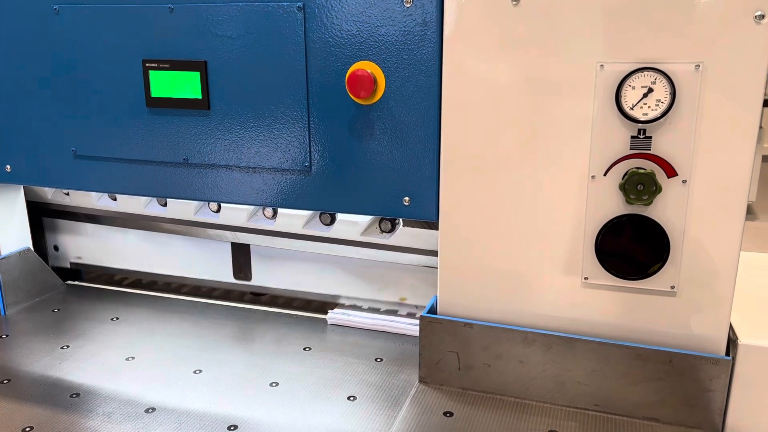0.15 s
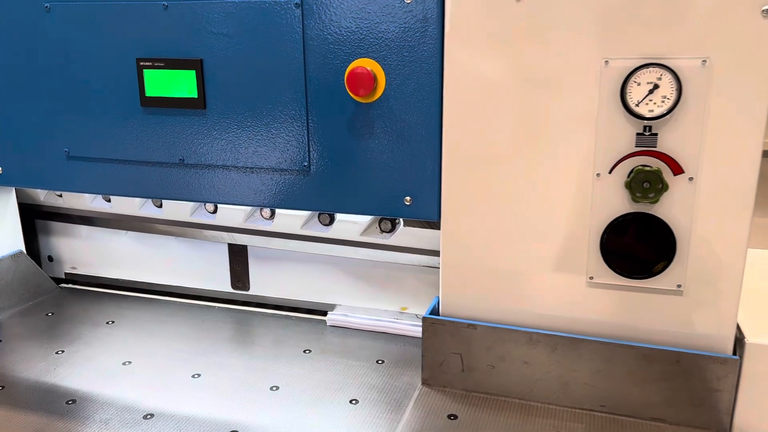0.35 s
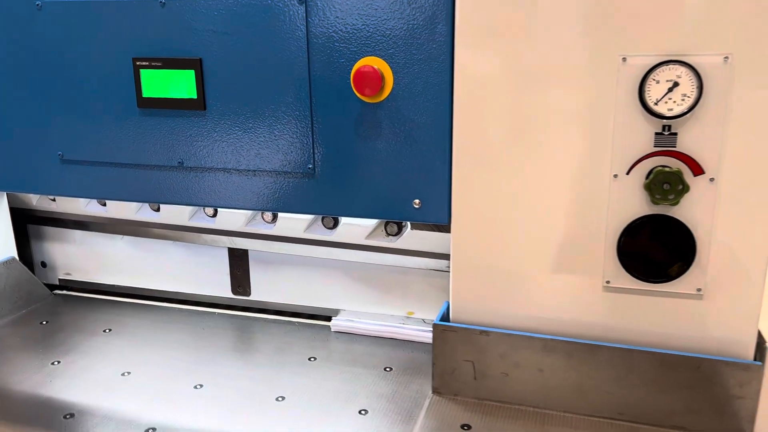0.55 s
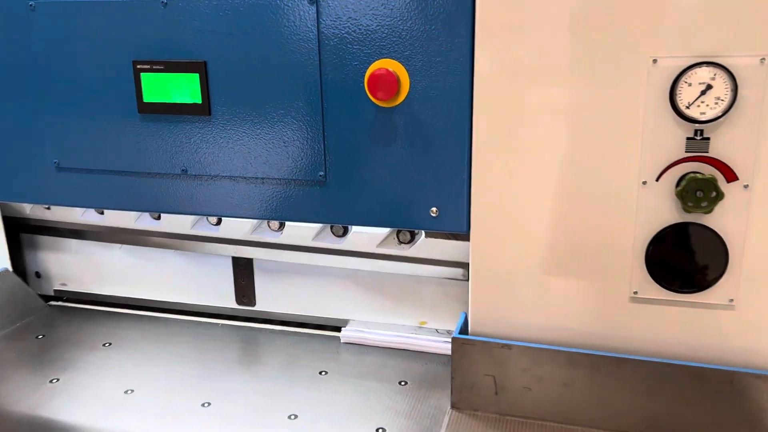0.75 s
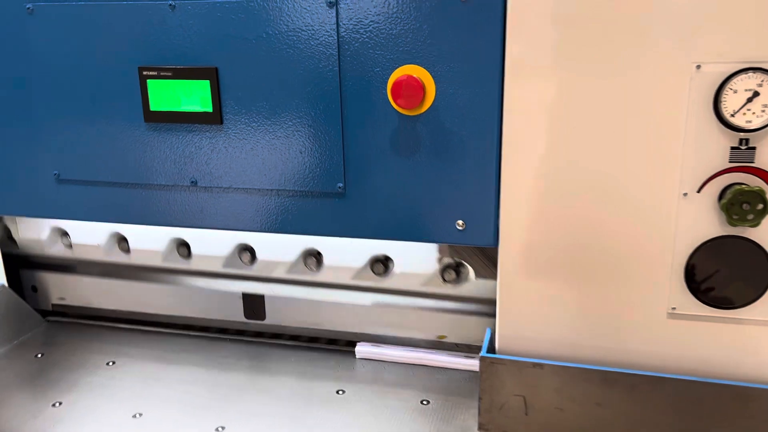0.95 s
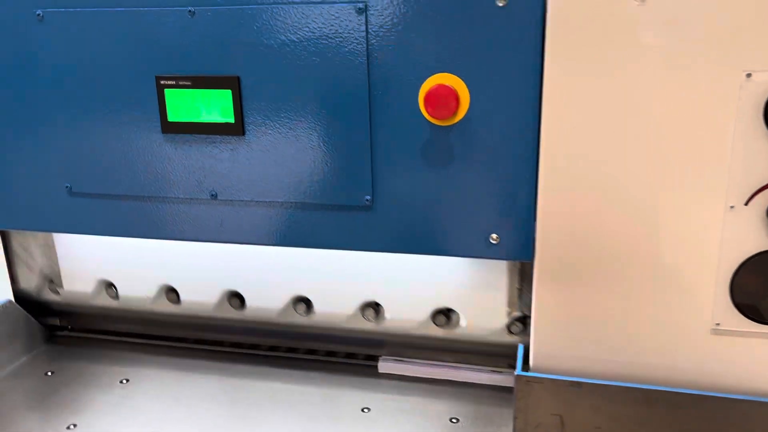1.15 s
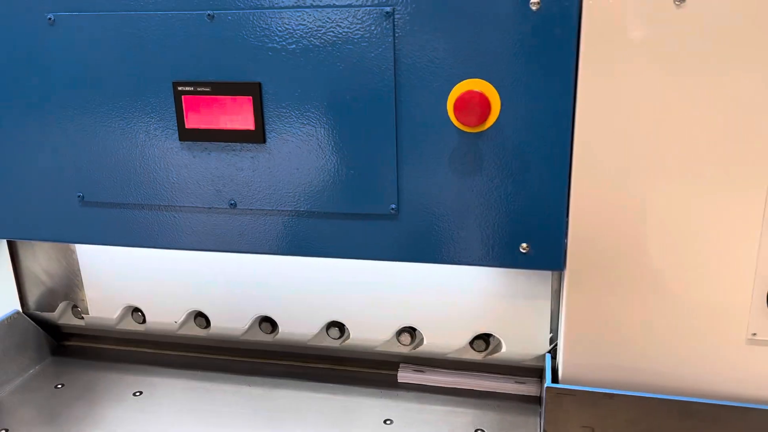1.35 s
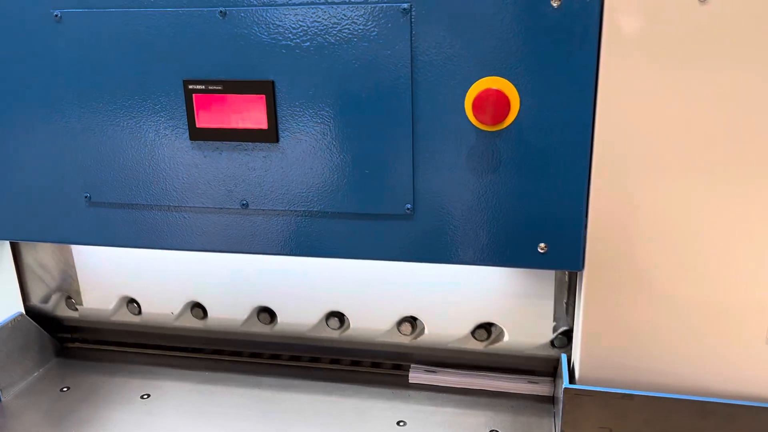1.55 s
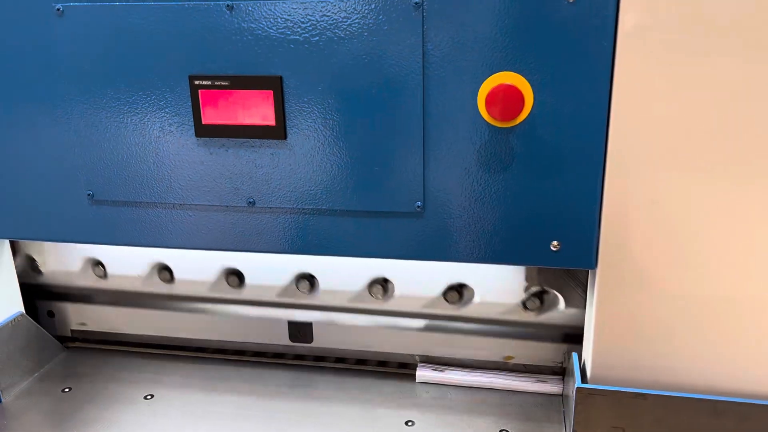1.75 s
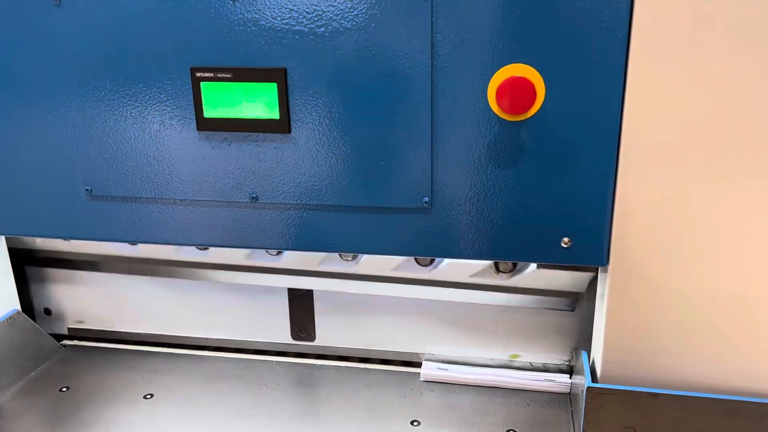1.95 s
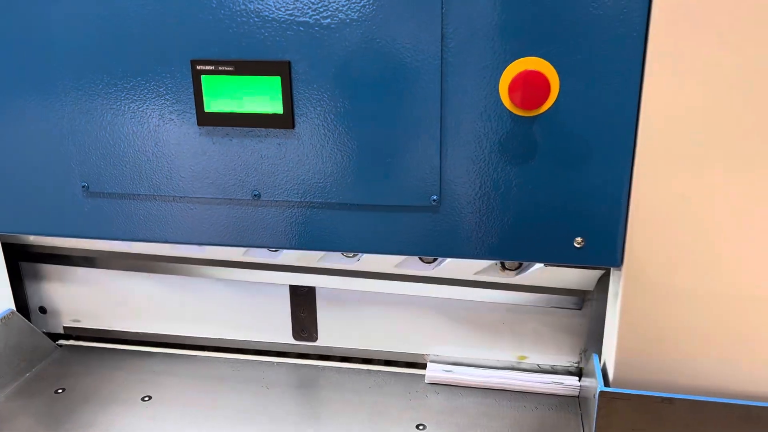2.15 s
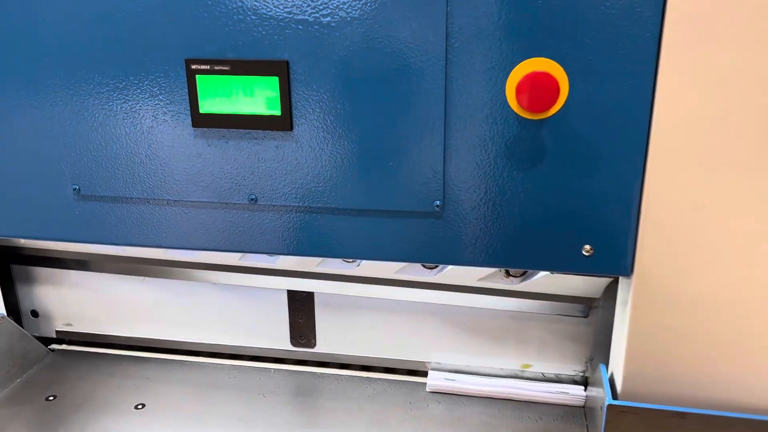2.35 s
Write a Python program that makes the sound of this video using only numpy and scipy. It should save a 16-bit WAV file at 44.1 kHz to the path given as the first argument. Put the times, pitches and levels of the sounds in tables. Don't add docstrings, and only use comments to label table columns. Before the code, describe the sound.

An industrial paper cutter, close in stereo in a humming, faintly whining workshop with a fading air leak. At 0.2 s a valve clacks, rattles and vents; oil rushes and the pump drones louder until the clamp thuds at 0.65. Gears and motor hum from 0.75. At 1.22 the knife shears paper with a bright hiss and dull crunch. Around 1.97 the brake clatters, then the flywheel hum fades.

```python
import sys
import numpy as np
from scipy import signal
from scipy.fft import rfft, irfft, next_fast_len
from scipy.io import wavfile

SR = 44100
rng = np.random.default_rng(int(sys.argv[2]) if len(sys.argv) > 2 else 0)


def undo_db(level):
    steps = np.asarray(level, float) / 20
    return 10 ** steps


def wrap_up_sound(samples):
    columns = np.atleast_2d(samples).T
    tamed = np.clip(columns, -1, 1)
    steps = np.round(tamed * 32767).astype(np.int16)
    wavfile.write(sys.argv[1], SR, steps)


N = 110250
TIME = np.arange(N) / SR
EDGES = 24 * 2 ** np.arange(0, 9.5, 1 / 3)
VALVE_S, OIL_S = 0.219, 0.223


def rms_one(x):
    return x / np.sqrt(np.mean(x ** 2) + 1e-20)


def in_time(rows):
    s, *columns = np.transpose(rows)
    return [np.interp(TIME, s, c) for c in columns]


def at_hz(points, hz, order=1):
    points = np.array(points)
    return np.interp(np.log(hz), np.log(points[:, 0]), points[:, order])


def drift(rate):
    r = np.exp(-80 * np.pi * rate / SR)
    slow = signal.lfilter([1], [1, -2 * r, r * r], rng.standard_normal(N // 40 + 2002))[2000:]
    return np.interp(np.arange(N) / 40, np.arange(len(slow)), rms_one(slow))


def share(spectrum):
    hz = np.sqrt(EDGES[1:] * EDGES[:-1])
    power = undo_db(2 * at_hz(spectrum, hz)) * np.diff(EDGES)
    return (power / power.sum())[:, None]


def tone(hz, width_hz, rough):
    turn = 2 * np.pi * np.cumsum(hz + 0 * TIME) / SR
    draws = []
    for _ in range(2):
        phase = turn + rough * drift(width_hz) + rng.uniform(0, 2 * np.pi)
        strength = np.abs(1 + 0.38 * rough * drift(width_hz))
        draws.append(np.sqrt(2) * np.sin(phase) * strength)
    return np.array(draws)


def shop_air():
    # frequency in Hz, density in dB per Hz
    shop_spectrum = [(25, -36), (110, -3), (300, -5.5), (900, -16), (1600, -19), (5600, -43.5), (8200, -34),
                     (15000, -47)]
    return share(shop_spectrum) * undo_db(2 * -33)


def shop_whine():
    # pitch in Hz, width in Hz, level in dB
    whines = [(803, 7.5, -50), (844, 8, -50.5), (873, 4, -44), (893, 6.4, -48), (1120, 6.6, -52.5),
              (4040, 140, -59.5), (4130, 130, -60.5)]
    masked = (TIME > VALVE_S) * (TIME < 2.0)
    return undo_db(-6 * masked) * sum(undo_db(db) * tone(hz, width, rough=0.6 + width / 120)
                                  for hz, width, db in whines)


def air_leak():
    # frequency in Hz, density in dB per Hz
    leak_spectrum = [(2500, -17), (4200, -9), (5400, -13), (7000, -21)]
    t60_s = 2.8
    return share([(20, -90)] + leak_spectrum + [(20000, -90)]) * undo_db(2 * -41.5 - 120 * TIME / t60_s)


def frame_rumble():
    # time in seconds, level in dB
    load_curve = [(0, -26.5), (.2, -38), (.25, -16.5), (.45, -26), (.62, -29.5), (.72, -26), (.78, -24.5),
                  (1.2, -25), (1.45, -23), (1.6, -25.5), (1.95, -23), (2.05, -25.5), (2.25, -29.5),
                  (2.5, -43)]
    # frequency in Hz, density in dB per Hz
    rumble_spectrum = [(25, -38.5), (100, -6.5), (280, -2), (750, -21.5), (2700, -27.5), (6000, -42.5),
                       (8200, -41), (15000, -57.5)]
    return share(rumble_spectrum) * undo_db(2 * in_time(load_curve)[0] - 3.5)


def pump():
    # time in seconds, pitch in Hz, level in dB
    pump_curve = [(0, 221.9, -35.5), (.2, 223.1, -41), (.23, 224.3, -28.5), (.36, 226.2, -29),
                  (.42, 225.9, -22), (.64, 221.2, -20), (.69, 220, -27), (.77, 219.8, -25.5),
                  (.82, 219.5, -26), (.95, 221.1, -27.5), (1.95, 218.4, -29.5), (2.15, 219, -32.5),
                  (2.32, 220, -50), (2.5, 221.6, -41.5)]
    # multiple of the pulse rate, level in dB
    pump_orders = [(1, -0.5), (2, -20), (3, -34)]
    hz, db = in_time(pump_curve)
    return sum(undo_db(db + order_db) * tone(k * hz, 3.8 * k, rough=0.35 * k) for k, order_db in pump_orders)


def vent_and_shear():
    # time in seconds, level in dB
    slide_curve = [(.217, -68), (.222, -32.5), (.29, -40), (.33, -55.5), (1.218, -63), (1.222, -19),
                   (1.26, -25.5), (1.32, -30), (1.345, -43), (1.52, -39.5), (1.56, -45), (1.93, -47),
                   (2.09, -43.5), (2.14, -98)]
    # frequency in Hz, density in dB per Hz
    shear_spectrum = [(700, -12.5), (1200, -16.5), (2500, -21), (4500, -22), (6500, -36.5), (8500, -20),
                      (14000, -24.5)]
    return share([(200, -52.0)] + shear_spectrum) * undo_db(2 * in_time(slide_curve)[0])


def blows(hz):
    # start in seconds, level in dB, tilt in dB per octave, T60 in seconds
    valve_blows = [
        (.219, -11, -1, 0.051),
        (0.223, -16.5, -1.5, 0.12),
        (.2405, -21, -1.5, 0.052),
        (0.247, -14.5, -3, 0.12),
        (.269, -19, -2, 0.061),
    ]
    clamp_blows = [
        (0.646, -21, -3, 0.16),
        (0.67, -41.5, 0.5, 0.078),
        (0.753, -33, -6.5, 0.4),
        (0.843, -62, -8, 0.12),
    ]
    knife_blows = [
        (1.2194, -30, 4, 0.018),
        (1.236, -35, -10, 0.13),
        (1.274, -25.5, -1.5, 0.27),
        (1.305, -39, -2.5, 0.072),
    ]
    brake_blows = [
        (1.9642, -23, -2, 0.13),
        (1.966, -20.5, -3, .06),
        (1.972, -15.5, -4.5, 0.06),
        (1.977, -20, -4.5, 0.2),
        (1.996, -24, -4, 0.1),
        (1.942, -42, 2, 0.06),
    ]
    hall_db, hall_t60_s = -23.5, 1
    knee_hz, below_knee_db = 556, 5.5
    top_hz, top_steeper = 3500, 5
    t = TIME[:SR * 3 // 4]
    dulling = (hz / 1000) ** 0.32
    rise = 1 - np.exp(-t / (0.91 / hz + 0.001))
    hall = undo_db(2 * hall_db - 120 * t * dulling / hall_t60_s)
    octaves = np.log2(max(hz, knee_hz) / 1000)
    top = top_steeper * np.log2(max(hz / top_hz, 1))
    thinning_db = below_knee_db * np.log2(min(hz / knee_hz, 1))
    out = np.zeros(N + SR)
    for s, db, tilt_db, t60 in valve_blows + clamp_blows + knife_blows + brake_blows:
        power = undo_db(2 * (db + tilt_db * octaves + min(tilt_db, 0) * top + thinning_db))
        decay = np.exp(-2 * np.log(1000) * dulling / t60 * t)
        start = int(s * SR)
        out[start:start + len(t)] += power * rise * (decay + hall)
    return out[:N] / 8


def rings():
    # start in seconds, pitch in Hz, level in dB, T60 in seconds
    thuds = [(.222, 232, -2, 0.039), (.246, 233, -23.5, 0.16), (.25, 121.2, -20, 0.32), (.25, 440, -17, .1),
             (.653, 420, -16, .08), (.31, 328.4, -22.5, 0.34), (.269, 325.4, -16.5, 0.18),
             (.649, 461, -6, 0.026), (.655, 283.6, -10.5, .15), (1.219, 153.3, -11, 0.13),
             (1.2242, 212, -13, 0.12), (1.2335, 217, -8, 0.12), (1.2382, 215, -9, .07),
             (1.236, 353.4, -12, 0.12), (1.44, 124.6, -15.5, 0.32), (1.37, 199, -14, .15),
             (1.455, 172, -14.5, 0.14), (1.958, 253, -13.5, .06), (1.969, 500, -5, 0.06),
             (1.972, 300, -10.5, 0.079), (1.9792, 295, -1, 0.045), (1.979, 345, -9, 0.065),
             (1.97, 624, -13.5, .08), (1.992, 481, -17, 0.097), (2.012, 131.6, -10, 0.13),
             (2.014, 198, -15, 0.088)]
    # start in seconds, pitch in Hz, level in dB, T60 in seconds
    pings = [(0.219, 1355, -13.5, 0.042), (.221, 833, -9.5, 0.034), (.245, 838, -10, 0.07),
             (.241, 2150, -17, .05), (.248, 2030, -20, 0.064), (.242, 2800, -23, 0.055),
             (0.7, 700, -33, 0.054), (0.649, 1057, -24, 0.06), (.845, 1100, -25, 0.055),
             (1.221, 2450, -20.5, 0.046), (1.254, 2550, -24, .06), (1.226, 4400, -28, 0.054),
             (1.284, 3100, -26.5, .05), (1.29, 4900, -31.5, 0.056), (1.22, 8300, -25, 0.027),
             (1.28, 560, -21.5, .15), (1.274, 1010, -15, 0.09), (1.27, 1110, -20, 0.069),
             (1.222, 1580, -20, 0.055), (1.355, 910, -27, 0.11), (1.272, 2070, -22, 0.07),
             (1.302, 715, -17, 0.08), (.648, 2800, -27, .05), (.65, 3300, -29, .04), (.652, 1900, -27, .05),
             (.258, 1650, -22, .08), (.232, 1900, -22, .05), (1.838, 1036, -26.5, 0.2),
             (1.966, 2270, -19.5, 0.037), (1.968, 1160, -15.5, 0.068), (1.97, 1060, -16.5, 0.11),
             (1.966, 1450, -19.5, .05), (1.97, 2090, -23, .05), (1.966, 2440, -24, 0.04),
             (1.972, 2900, -27, 0.037), (1.974, 3720, -31, 0.034), (1.97, 790, -15, 0.11),
             (1.995, 1050, -16, 0.051), (0.219, 2840, -11.5, .03), (.22, 3700, -23, 0.029),
             (.22, 2620, -16, 0.036)]
    out = np.zeros((2, N))
    for s, hz, db, t60 in thuds + pings:
        start = int(s * SR)
        t = TIME[:min(SR // 2, N - start)]
        swell = 1 - np.exp(-t / (0.3 / hz + 0.0008))
        phase = rng.uniform(0, 2 * np.pi) * np.array([[0], [1]])
        out[:, start:start + len(t)] += undo_db(db - 60 * t / t60) * swell * np.sin(2 * np.pi * hz * t + phase)
    return out


def oil_flow():
    # frequency in Hz, density in dB per Hz
    oil_spectrum = [(600, -5), (1200, 3), (2800, -9), (5000, -42)]
    t60_s = 2.95
    flow = (TIME > OIL_S) * undo_db(2 * -32 - 120 * (TIME - OIL_S) / t60_s)
    return share([(20, -90)] + oil_spectrum + [(20000, -90)]) * flow


def gear_drive():
    # pitch in Hz, width in Hz, level in dB
    gear_tones = [(243, 5, -37), (279.8, 6, -28.5), (327, 7.8, -38), (371.2, 4.1, -42), (384.6, 6, -37.5),
                  (465.2, 5.2, -35), (561, 1.8, -40), (624.6, 7.1, -44.5), (666, 5, -48.5), (1030, 13, -47),
                  (1051, 12, -47), (2055, 14, -51.5)]
    on_s, off_s, rise_s, t60_s = 0.715, 1.99, 0.075, 0.38
    on = np.clip((TIME - on_s) / rise_s, 0, 1) * undo_db(-60 * np.maximum(TIME - off_s, 0) / t60_s)
    return on * sum(undo_db(db) * tone(hz, width, rough=0.6 + width / 30) for hz, width, db in gear_tones)


def mains():
    on_s, off_s = 0.8, 1.84
    loaded = np.clip(np.minimum(TIME - on_s, off_s - TIME) / 0.072, .15, 1)
    powered = (TIME > on_s - .05) * np.clip((2.2 - TIME) / 0.33, 0, 1)
    return undo_db(-31) * loaded * powered * tone(100.8, 1.5, rough=0.12)


def coast():
    # pitch in Hz, width in Hz, level in dB
    coast_tones = [(199, 4.4, -30), (295, 5, -34.5), (397, 5.9, -31.5), (514, 6.4, -37.5)]
    start_s, rise_s, t60_s = 2.01, 0.071, 1.7
    on = np.clip((TIME - start_s) / rise_s, 0, 1) * undo_db(-60 * np.maximum(TIME - start_s, 0) / t60_s)
    return on * sum(undo_db(db) * tone(hz, width, rough=0.53) for hz, width, db in coast_tones)


def noises():
    wavering = shop_air() + frame_rumble()
    smooth = air_leak() + vent_and_shear() + oil_flow()
    white = rng.standard_normal((2, 2, N + 8192))
    together = drift(12.5)
    out = np.zeros((2, N))
    for k, (low, high) in enumerate(zip(EDGES, EDGES[1:])):
        sos = signal.butter(2, [low, high], "band", fs=SR, output="sos")
        band = rms_one(signal.sosfilt(sos, white[k % 2])[:, -N:])
        waver_db = 0.6 * together + 1.4 * drift(7.1) * min(1, (500 / low) ** .5)
        power = wavering[k] * undo_db(2 * waver_db) + smooth[k] + blows(np.sqrt(low * high))
        out += band * np.sqrt(power)
    return out


def scene():
    return shop_whine() + pump() + noises() + rings() + gear_drive() + mains() + coast()


def low_pass(x):
    return signal.sosfilt(signal.butter(12, 16480, fs=SR, output="sos"), x)


def record(dry):
    # frequency in Hz, sum level in dB
    port_sum = [(8500, -1), (9300, -12.5), (9700, -31.5), (10700, -23.5), (11500, -9), (14500, -3.5),
                (15600, -15), (16500, -34)]
    # frequency in Hz, difference level in dB, share in step with the sum (0 to 1)
    port_diff = [(59, -18.5, 1), (300, -18.5, 0.63), (600, -8, 0.33), (1200, -2.5, 0.28),
                 (3000, -6.5, 0.39), (6000, -4, 1), (8500, -3, 0.9), (12000, -7.5, 0.85)]
    # frequency in Hz, width in Hz, depth in dB
    port_nulls = [(7000, 570, -19), (13400, 1100, -19), (16600, 800, -21)]
    size = next_fast_len(N + 4096)
    hz = np.arange(size // 2 + 1) * SR / size + 1
    first, second = rfft(dry, size)
    mid = undo_db(at_hz(port_sum, hz)) * first
    alike = np.clip(at_hz(port_diff, hz, order=2), -.99, .99)
    null_db = sum(db * np.exp(-((hz - at) / width) ** 4) for at, width, db in port_nulls)
    phase = np.minimum(0.6 + (hz / 7500) ** 2, np.pi / 2)
    mixed = alike * np.exp(1j * phase) * first + np.sqrt(1 - alike ** 2) * second
    side = undo_db(at_hz(port_diff, hz) + null_db) * mixed
    ports = irfft(np.array([mid + side, mid - side]), size)[:, :N]
    return low_pass(1.26 * np.tanh(ports / 1.196))


dry = scene()
out = record(dry)
wrap_up_sound(out)
```